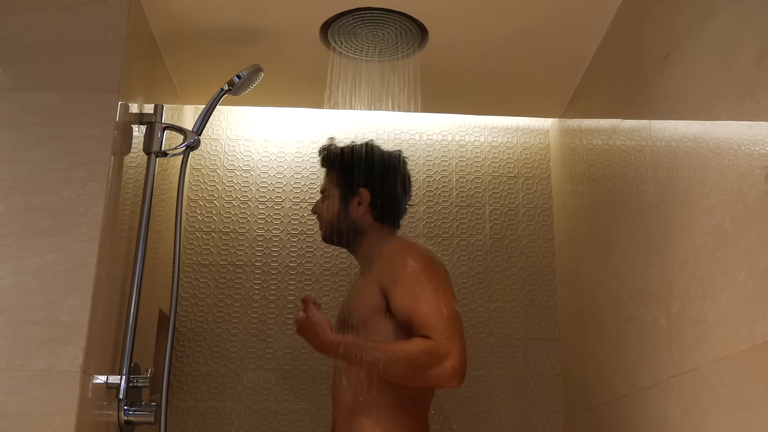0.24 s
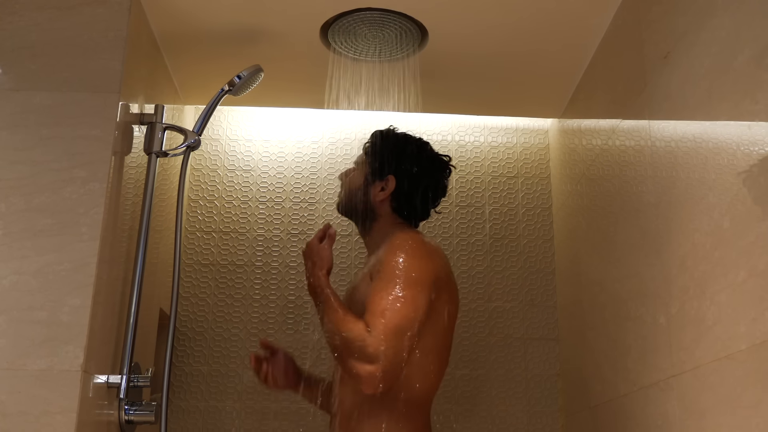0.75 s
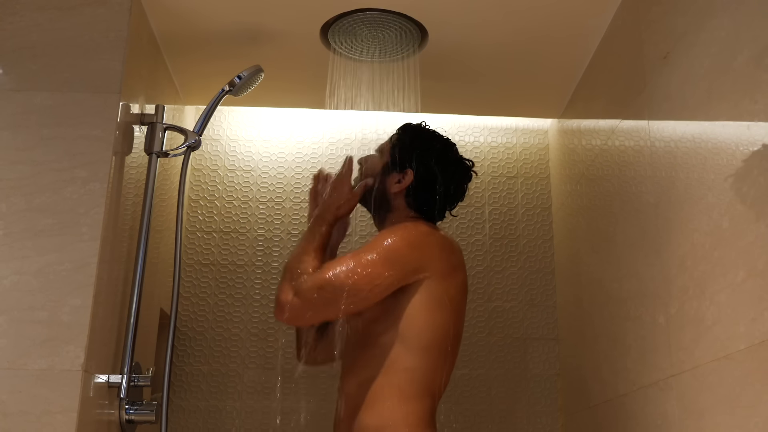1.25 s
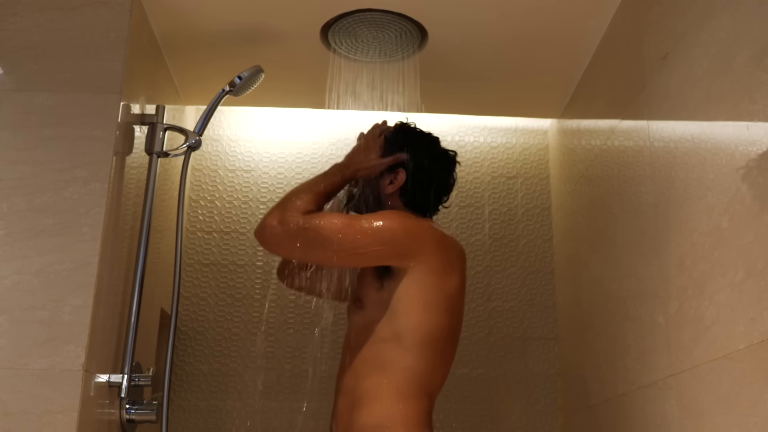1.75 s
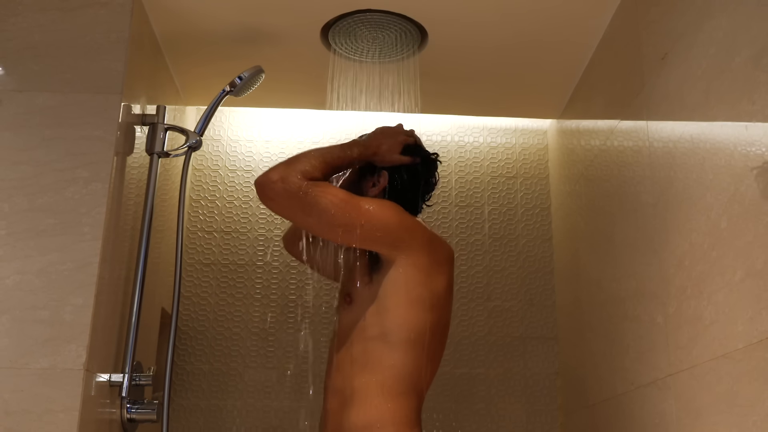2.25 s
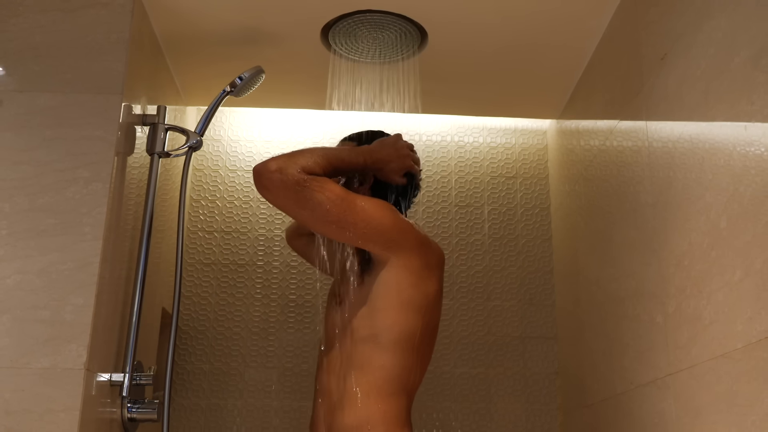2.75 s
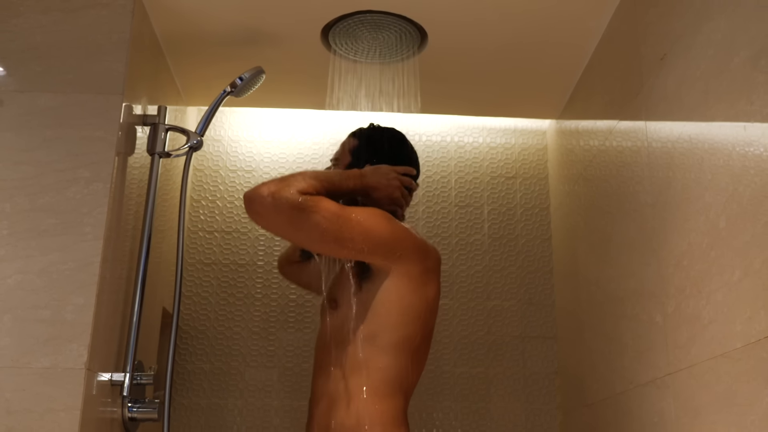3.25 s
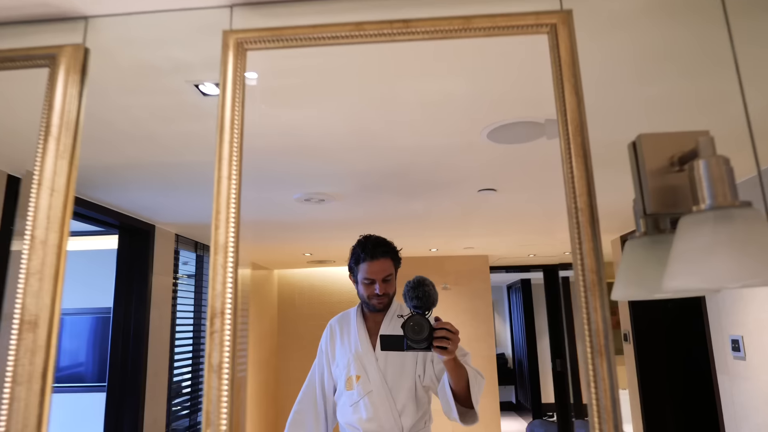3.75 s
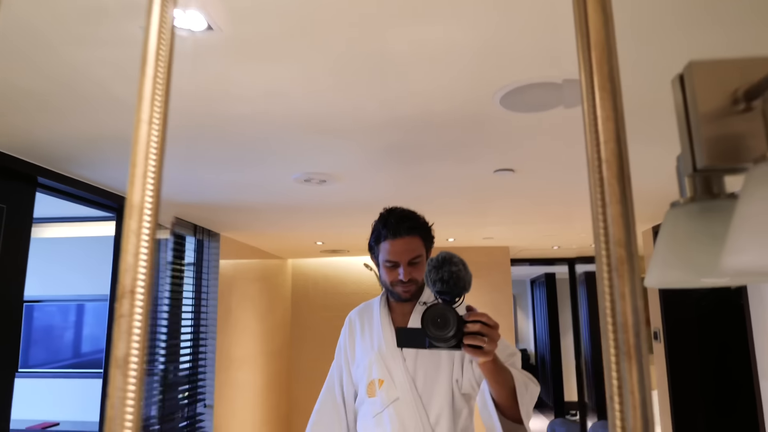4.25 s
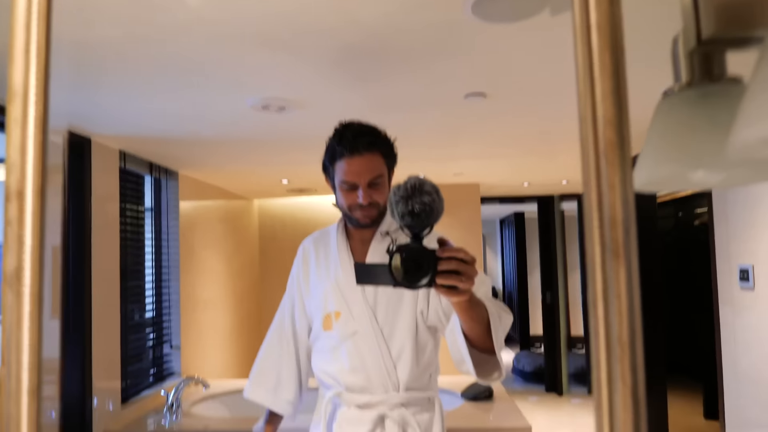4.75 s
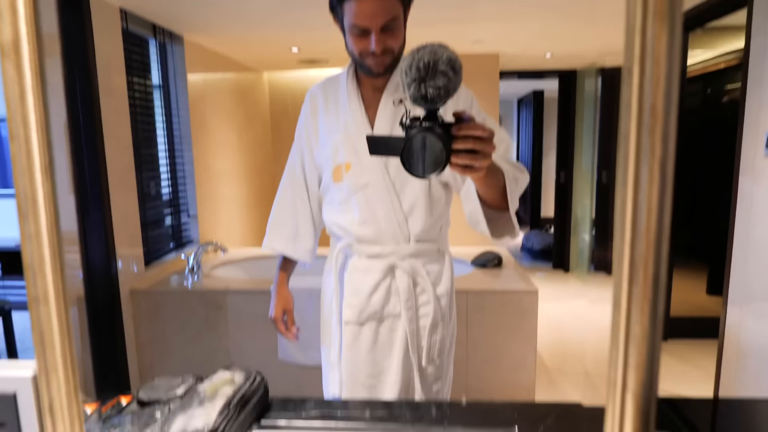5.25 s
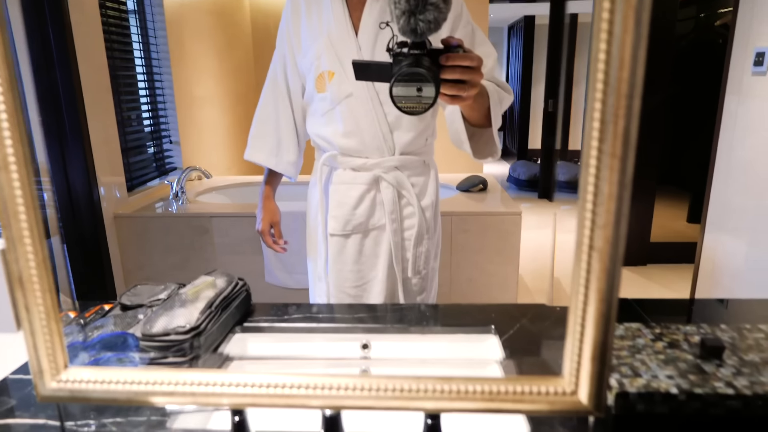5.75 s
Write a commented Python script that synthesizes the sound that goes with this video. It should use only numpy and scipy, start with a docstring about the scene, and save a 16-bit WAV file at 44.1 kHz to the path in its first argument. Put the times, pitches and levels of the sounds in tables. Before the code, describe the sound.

A rain shower pours on a man in a tiled stall: dense, bright patter with hollow drumming and low rumble. As he rinses his face and hair, water spills off his arms and slaps the floor in bursts. Suddenly it cuts to a much quieter bathroom with low ventilation hum, a few soft footfalls and faint robe rustle that settles. Water is fairly close with short, tiled reflections; both channels are alike.

```python
"""An overhead rain shower patters on a man in a tiled stall: shaped random impacts over ringing resonances.
As he rinses face and hair, water spills off his arms in clumps of impacts and slaps on the floor in bursts.
At SWITCH_S the scene switches abruptly to a quiet bathroom, where filtered noise makes the ventilation hum.
He takes a few soft steps, dull grain bursts, in a robe of rustling fine grains that comes to rest."""
import sys
import numpy as np
from scipy import signal
from scipy.fft import rfft, irfft
from scipy.io import wavfile

SR = 44100
rng = np.random.default_rng(int(sys.argv[2]) if len(sys.argv) > 2 else 0)


def master_out(mix):
    """Clip the mix to full scale and print it as 16-bit PCM to the path in sys.argv[1]."""
    frames = np.transpose(np.atleast_2d(mix))
    ceiling = np.clip(frames, -1, 1)
    pcm = np.round(ceiling * 32767).astype(np.int16)
    wavfile.write(sys.argv[1], SR, pcm)


N = 264156
TIME, BINS = np.arange(N) / SR, np.fft.rfftfreq(N, 1 / SR)  # s, Hz
SWITCH_S, SWITCH_FADE_S = 3.731, 0.0021
LOW_CUT_HZ, TREBLE_LIMIT_HZ = 31, 15780

# Spectra; the result is rescaled, so only differences count. Each row: frequency in Hz, relative dB per Hz.
VENT_SPECTRUM = [(24, -20), (45, -10), (60, -17.5), (115, -3), (155, -7.5), (220, -7.5), (265, -12),
                 (390, -15.5), (520, -19.5), (750, -26.5), (1200, -36), (2300, -45.5), (4200, -48.5),
                 (6000, -55), (15500, -56)]  # moving air
ROBE_SPECTRUM = [(500, -14), (1000, 10), (1600, 4), (2400, 2.5), (4200, 3.5), (5500, -7), (8000, -11),
                 (15500, -24)]  # rubbing towelling
RUMBLE_SPECTRUM = [(10, -50), (26, -30.5), (42, -11), (58, -26), (78, -1), (100, 2), (125, -0.5), (145, -3),
                   (165, 1), (195, -10), (240, -9), (400, -17), (900, -68.5)]  # low rumble of the stall
RUNOFF_SPECTRUM = [(1000, -22.5), (2200, -7), (3200, -3), (4200, 5), (5200, -2.5), (7000, -4.5), (9000, -7),
                   (11000, -17.5), (15500, -24)]  # heavy drops off the arms
SPRAY_SPECTRUM = [(200, -6.5), (400, -3.5), (620, -5), (870, 0.5), (1200, -6), (1600, -2.5), (2700, -4),
                  (3600, 0.5), (4400, -0.5), (5100, -5.5), (7800, -8.5), (8800, -5.5), (10300, -10),
                  (15500, -10)]  # steady patter
POPS_SPECTRUM = [(300, -24.0), (800, -5.5), (1400, -4), (2400, -4.5), (5000, -23.5)]  # fat drops
MIST_SPECTRUM = [(4000, -16.5), (7400, -2.5), (8700, -1.5), (10300, -3.5), (13000, -3.0), (15500, -4.5)]

# Resonances. Each row: frequency in Hz, half-width of one pass in Hz, relative level in dB.
DUCT_MODES = [(75.1, 7.4, -3), (103, 3.4, -2.5), (122.9, 11.7, -0.5), (180.6, 7.3, -12.5),
              (218.2, 8.6, -8.5), (311.4, 6.4, -12), (391.6, 14.4, -13.5), (597.6, 8, -18)]  # ducts of the quiet room
STALL_MODES = [(236, 9.1, 2), (258.7, 15, 0.5), (458.7, 19, -1.5), (525.3, 24, -2), (616.3, 15, 1),
               (657.6, 15, -0.5), (721.5, 9, -9), (765, 21, -2), (943, 20, 1), (1080, 14, 0),
               (1135, 18, -2.5), (1277, 17, -5.5), (1432, 16, -2.5), (1473, 46, 2.5), (1555, 28, -1)]  # stall under the spray
GURGLE_MODES = [(1273, 12, -3.5), (1332.6, 15, 1), (1394, 24, -9)]  # gurgle

# Echoes of the tiled stall. Each row: frequency in Hz, t60 in seconds.
TILES_T60 = [(200, 0.73), (1000, 0.54), (4000, 0.72), (8000, .33), (15000, 0.17)]

# Level curves. Each row: time in seconds, level in dB.
WALK_LEVEL = [(3.75, -66.5), (4.65, -65.5), (5.0, -78), (5.99, -79)]  # robe rubs as he walks, then comes to rest
GURGLE_LEVEL = [(0, -42.5), (1.35, -43.5), (2.1, -44.5), (3.72, -46)]  # gurgle sinks once the hands reach the hair
MIST_LEVEL = [(0, -34.5), (.68, -40.5), (1.15, -32.5), (1.6, -33), (2.35, -30.5), (2.62, -36.5), (3.0, -34),
              (3.72, -37)]  # fine mist thrown off head and shoulders

# Swells. Each row: start in seconds, length before the fall in seconds, level in dB.
ROBE_SWINGS = [(3.99, 0.077, -62), (4.24, 0.038, -63.5), (4.46, .04, -65)]  # stronger swings of the robe
HOLLOW_SWELLS = [(.14, .06, -39), (.265, 0.15, -38.5), (.96, .22, -39.5), (1.28, 0.085, -39),
                 (1.68, 0.036, -33), (1.94, 0.039, -32), (2.37, 0.031, -32.5), (2.66, 0.043, -35.5),
                 (3.16, 0.034, -28), (3.23, 0.16, -36.5), (3.4, 0.057, -34)]  # hollow note while the stream drums squarely
ARM_SPILLS = [(1.15, .1, -30.5), (1.25, 0.069, -27), (1.52, .16, -31.5), (1.92, 0.057, -32),
              (2.16, 0.51, -32), (2.36, 0.18, -29), (2.78, 0.14, -25.5), (3.14, .59, -30)]  # water spilt by each sweep of the hands

# Bursts. Each row: start in seconds, level in dB, centre in Hz, spread in octaves, length in seconds.
SLEEVE_BRUSHES = [(3.995, -65, 1620, 0.13, 0.11), (4.002, -63, 3000, 0.6, 0.019),
                  (4.25, -64, 1500, 0.74, .05), (4.455, -72, 7000, 1.1, .06),
                  (5.088, -67, 3400, 0.33, .014), (5.585, -68, 1800, .4, 0.018)]  # sleeve brushing past
FOOTFALLS = [(3.96, -38.5, 112, 0.071, 0.07), (4.12, -40.5, 110.5, 0.1, 0.078),
             (4.23, -41.5, 118, 0.13, 0.098), (4.46, -41, 70, 0.52, 0.085)]  # dull footfalls

# Biggest lumps landing. Each row: start in seconds, level in dB before SPLASH_GAIN_DB, centre in Hz,
# spread in octaves.
BIG_SPLASHES = [(0.137, -28.5, 5900, 0.35), (.288, -31.5, 11200, .6), (.386, -29.5, 4000, 0.075),
                (0.435, -34, 4330, 0.13), (0.529, -27.5, 8700, 0.71), (.762, -29.5, 8000, 0.71),
                (0.862, -28.5, 8500, 0.5), (1.31, -25, 4200, 0.32), (1.336, -22, 3610, 0.21),
                (1.396, -27.5, 9200, 0.43), (1.467, -29, 9000, 0.36), (1.519, -27.5, 3720, 0.12),
                (1.593, -24.5, 6000, 0.94), (1.871, -25.5, 4000, 0.32), (1.965, -23, 6350, 0.37),
                (2.253, -29, 6200, .4), (2.291, -27.5, 6800, .52), (2.332, -25.5, 5900, 0.49),
                (2.387, -29.5, 8000, .9), (2.456, -23.5, 5650, 0.43), (2.61, -25.5, 3930, .17),
                (2.792, -25.5, 4700, .4), (2.83, -22.5, 5130, 0.53), (2.85, -30.5, 5500, .5),
                (2.93, -25, 4270, 0.68), (3.026, -28, 6550, 0.33), (3.092, -32, 12500, .2),
                (3.125, -21.5, 3430, 0.24), (3.142, -22.5, 3700, 0.68), (3.236, -22, 4660, 0.27),
                (3.293, -22, 3160, 0.31), (3.382, -27, 6450, .36), (3.412, -26.5, 4000, .2),
                (3.482, -17, 4100, 0.47), (3.537, -25.5, 5900, .8), (3.602, -24, 5500, 0.57),
                (3.657, -26, 9350, .63), (3.678, -24.5, 4100, 0.17), (3.716, -27, 5040, 0.65)]

AIR_DB, DUCT_DB = -44.5, -43.5
SWING_RISE_S, SWING_FALL_S, SWING_REST_DB = 0.023, 0.072, -89
STALL_DB, RUMBLE_DB = -39, -41
SWELL_RISE_S, SWELL_FALL_S, HOLLOW_REST_DB = 0.032, 0.03, -44.5
HOLLOW_START_HZ, HOLLOW_RISE_HZ_PER_S, HOLLOW_WIDTH_HZ = 727.8, 10, 62
SPILL_RISE_S, SPILL_FALL_S, TRICKLE_DB = 0.11, 0.11, -43
SPLASH_S, SPLASH_GAIN_DB = 0.014, 1
# small lumps: level before SPLASH_GAIN_DB, middle pitch; scatters are standard deviations
SMALL_DB, SMALL_SCATTER_DB = -33, 0.5
SMALL_HZ, SMALL_SCATTER_OCT, SMALL_SPREAD_OCT = 6500, 0.67, 0.24
PATTER_DB, POPS_DB = -29.5, -42
SWAY_RMS_DB, SWAY_HZ = 0.5, 3
WET_DB, ECHO_GAP_S, PLACES_PER_S = -6.5, 0.003, 90


def amp(db):
    """Decibels to gain."""
    return 10 ** (np.asarray(db) / 20)


def unit(x):
    """Scales to an rms of 1."""
    return x / np.sqrt(np.mean(x ** 2) + 1e-20)


def read(points, hz):
    """Interpolates a table on a log-frequency axis."""
    f, value = np.transpose(points)
    return np.interp(np.log(hz + 1), np.log(f + 1), value)


def level(rows):
    """A dB curve as a gain at every sample."""
    return amp(np.interp(TIME, *np.transpose(rows)))


def colour(x, points):
    """Filters x by a spectrum, to rms 1."""
    return unit(irfft(rfft(x) * amp(read(points, BINS)), N))


def ring(x, modes):
    """Passes x through parallel resonances, each applied twice for steep skirts, to rms 1."""
    response = sum(amp(db) / (1 + 1j * (BINS - hz) / width) ** 2 for hz, width, db in modes)
    return unit(irfft(rfft(x) * response, N))


def glide(x, hz, width_hz):
    """A resonance on a moving pitch: shift down, smooth twice, shift back, to rms 1."""
    turn = np.exp(2j * np.pi * np.cumsum(hz) / SR)
    r = np.exp(-np.pi * width_hz / SR)
    smooth = signal.lfilter([(1 - r) ** 2], [1, -2 * r, r * r], x / turn)
    return unit((turn * smooth).real)


def wander(rate_hz):
    """Slow chance of rms 1, with movements up to about rate_hz."""
    return unit(irfft(rfft(rng.standard_normal(N)) / (1 + (BINS / rate_hz) ** 4), N))


def drops(per_s, spread_db):
    """Random impacts of rms 1 overall: many small, a few large."""
    size = amp(spread_db * np.minimum(rng.exponential(1, N), 5))
    sign = rng.choice([-1, 1], N)
    return unit(size * sign * (rng.random(N) < per_s / SR))


def swells(rows, rise_s, fall_s, rest_db):
    """Each row rises, holds and dies away; their powers add to a resting level."""
    power = amp(rest_db) ** 2
    for start_s, length_s, db in rows:
        rise = np.clip((TIME - start_s) / rise_s, 0, 1)
        fall = np.exp(-np.maximum(TIME - start_s - length_s, 0) / fall_s)
        power = power + (amp(db) * rise * fall) ** 2
    return np.sqrt(power)


def bursts(rows, grains_per_s, rise, tail, size=16384):
    """Clumps of tiny impacts in one band: rise, hold, fall; rise and tail are in burst lengths."""
    t, hz = np.arange(size) / SR, np.fft.rfftfreq(size, 1 / SR) + 1
    out = np.zeros(N + size)
    for start_s, db, centre_hz, spread_oct, length_s in rows:
        grains = rng.uniform(-1, 1, size) * (rng.random(size) < grains_per_s / SR)
        band = np.exp(-(np.log2(hz / centre_hz) / (2 * spread_oct)) ** 2)
        age = t / length_s
        shape = np.minimum(age / rise, 1) * np.exp(-np.maximum(age - .7, 0) / tail)
        clump = irfft(rfft(grains) * band, size) * shape
        # energy as if the row's level lasted for its length
        scale = np.sqrt(length_s * SR / (np.sum(clump ** 2) + 1e-20))
        out[round(start_s * SR):][:size] += amp(db) * clump * scale
    return out[:N]


def smear(x, lag_s):
    """A drop is no ideal click: treble ticks first, the lower body follows up to lag_s later."""
    delay_s = lag_s * np.exp(-BINS / 9000)
    return irfft(rfft(x) * np.exp(-2j * np.pi * np.cumsum(delay_s) * SR / N), N)


def tiles(x, wet_db, size=20000, count=12):
    """Direct sound plus dense tile reflections; the landing place keeps moving between echo patterns."""
    sign = rng.choice([-1., 1.], (count, size))
    taps = sign * (rng.random((count, size)) < .08) * (np.arange(size) > ECHO_GAP_S * SR)
    hz, t, z = signal.stft(taps, SR, nperseg=256)
    decay = amp(-60 * t / read(TILES_T60, hz)[:, None])
    tails = signal.istft(z * decay, SR, nperseg=256)[1]
    place = np.cumsum(rng.exponential(1, N)) * PLACES_PER_S / SR % count
    wet = 0
    for k, tail in enumerate(tails):
        distance = abs((place - k + count / 2) % count - count / 2)  # around the circle of places
        share = np.cos(np.pi / 2 * np.minimum(distance, 1))
        wet = wet + signal.fftconvolve(x * share, tail / np.linalg.norm(tail))[:N]
    return (x + amp(wet_db) * wet) / np.hypot(1, amp(wet_db))


def ventilation():
    """Dull moving air with a few wavering duct notes, both from noise."""
    air = amp(AIR_DB) * colour(rng.standard_normal(N), VENT_SPECTRUM)
    duct = amp(DUCT_DB) * ring(rng.standard_normal(N), DUCT_MODES)
    return air + duct


def robe():
    """Towelling rubs in fine grains, swings and comes to rest; a sleeve brushes past."""
    swings = swells(ROBE_SWINGS, SWING_RISE_S, SWING_FALL_S, SWING_REST_DB)
    rubbing = np.hypot(level(WALK_LEVEL), swings)
    cloth = rubbing * colour(drops(per_s=6700, spread_db=1.5), ROBE_SPECTRUM)
    return cloth + bursts(SLEEVE_BRUSHES, grains_per_s=11000, rise=0.23, tail=.55)


def footsteps():
    """Soft steps: dull low bursts of grains."""
    return bursts(FOOTFALLS, grains_per_s=9000, rise=0.45, tail=0.24)


def stall():
    """The stall's resonances ring under random drops, over a low noise rumble."""
    ringing = amp(STALL_DB) * ring(drops(per_s=4000, spread_db=2), STALL_MODES)
    return ringing + amp(RUMBLE_DB) * colour(rng.standard_normal(N), RUMBLE_SPECTRUM)


def drumming():
    """Drops keep a hollow note of creeping pitch and a gurgle going."""
    pitch_hz = HOLLOW_START_HZ + HOLLOW_RISE_HZ_PER_S * TIME
    hollow = glide(drops(per_s=900, spread_db=1.0), pitch_hz, HOLLOW_WIDTH_HZ)
    note = swells(HOLLOW_SWELLS, SWELL_RISE_S, SWELL_FALL_S, HOLLOW_REST_DB) * hollow
    gurgle = level(GURGLE_LEVEL) * ring(drops(per_s=2700, spread_db=0.0), GURGLE_MODES)
    return note + gurgle


def runoff():
    """Broken streams from the arms land in clumps of heavier drops."""
    impacts = drops(per_s=3000, spread_db=2.0) * amp(2.5 * wander(45))
    flow = swells(ARM_SPILLS, SPILL_RISE_S, SPILL_FALL_S, TRICKLE_DB)
    return flow * colour(impacts, RUNOFF_SPECTRUM)


def splashes(count=14):
    """Lumps of water slap on the floor: big ones, and small ones at random between them."""
    times_s = (np.arange(count) + rng.random(count)) * SWITCH_S / count
    small = []
    for start_s, (size, pitch) in zip(times_s, rng.standard_normal((count, 2))):
        db = SMALL_DB + SMALL_SCATTER_DB * size
        centre_hz = SMALL_HZ * 2 ** (SMALL_SCATTER_OCT * pitch)
        small.append((start_s, db, centre_hz, SMALL_SPREAD_OCT))
    rows = [(*row, SPLASH_S) for row in BIG_SPLASHES + small]
    return amp(SPLASH_GAIN_DB) * bursts(rows, grains_per_s=3500, rise=.12, tail=0.64)


def mist():
    """The finest drops fizz in the treble, with a fast uneven level."""
    fizz = colour(drops(per_s=2400, spread_db=1.5), MIST_SPECTRUM)
    return level(MIST_LEVEL) * amp(1.5 * wander(28)) * fizz


def spray():
    """Thousands of drops a second tick on skin and tile; fat ones pop lower; the whole sways a little."""
    ticks = drops(per_s=7000, spread_db=2.0) * amp(0.97 * wander(30))
    patter = amp(PATTER_DB) * colour(ticks, SPRAY_SPECTRUM)
    pops = amp(POPS_DB) * colour(drops(per_s=80, spread_db=2.0), POPS_SPECTRUM)
    return amp(SWAY_RMS_DB * wander(SWAY_HZ)) * (patter + pops)


def scene():
    """The shower, then all at once the quiet room; both channels alike."""
    water = smear(spray() + mist() + runoff() + splashes(), lag_s=.001)
    shower = tiles(water, WET_DB) + drumming() + stall()
    bathroom = ventilation() + robe() + footsteps()
    gate = np.exp(-np.maximum(TIME - SWITCH_S, 0) / SWITCH_FADE_S)
    mono = gate * shower + (1 - gate) * bathroom
    return np.array([mono, mono])


def record(dry):
    """Low cut, then a steep treble limit."""
    lowcut = signal.butter(4, LOW_CUT_HZ, "highpass", fs=SR, output="sos")
    lowpass = signal.firwin(511, TREBLE_LIMIT_HZ, window=("kaiser", 9), fs=SR)
    return signal.oaconvolve(signal.sosfilt(lowcut, dry), lowpass[None], "same")


dry = scene()
out = record(dry)
master_out(out)
```